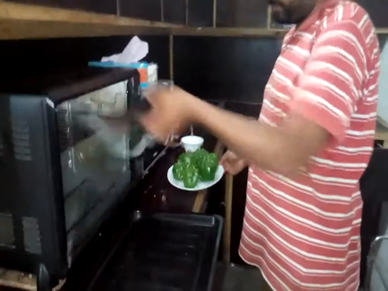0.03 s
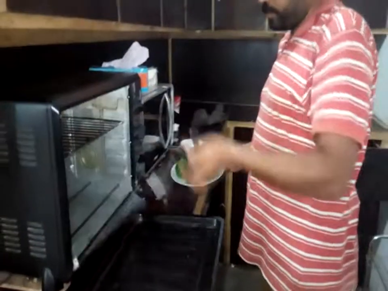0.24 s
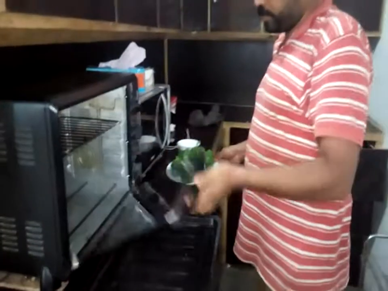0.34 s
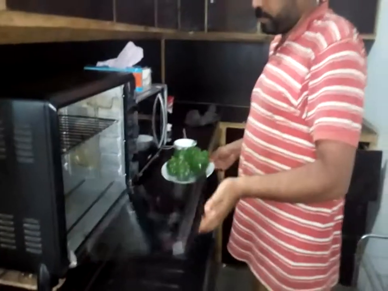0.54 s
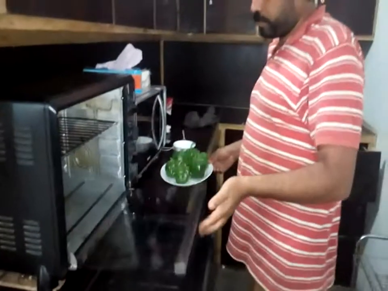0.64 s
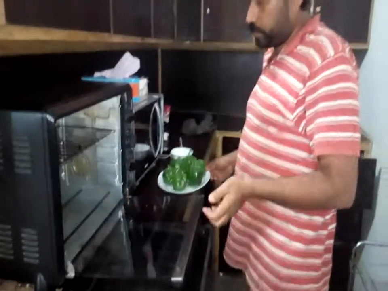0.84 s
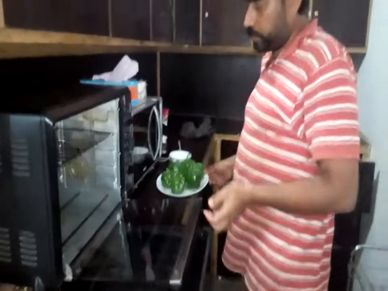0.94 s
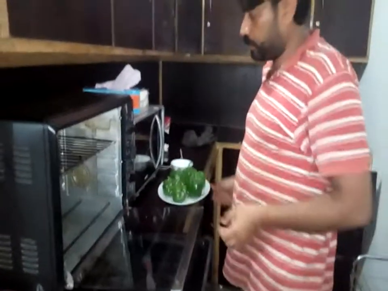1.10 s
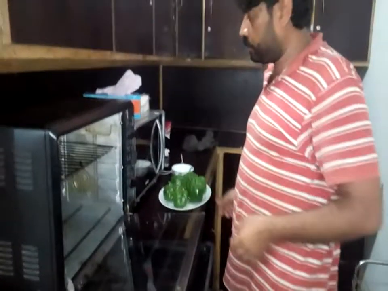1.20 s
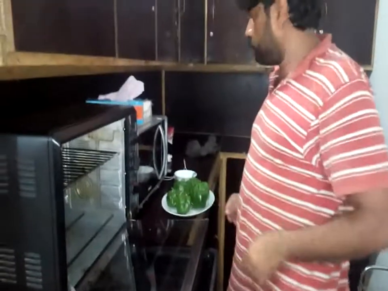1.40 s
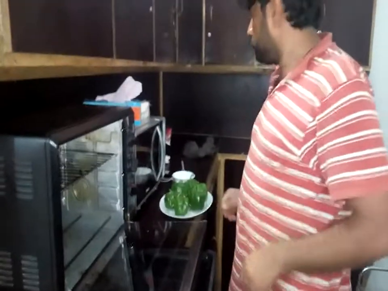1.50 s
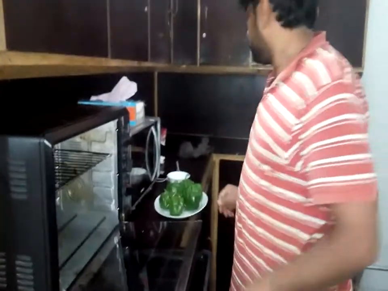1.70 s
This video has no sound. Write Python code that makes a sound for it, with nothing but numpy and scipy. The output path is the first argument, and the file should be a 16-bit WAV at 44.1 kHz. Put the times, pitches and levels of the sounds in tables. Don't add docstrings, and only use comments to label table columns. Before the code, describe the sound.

In a quiet, echoing kitchen, an oven door squeaks upward briefly, rattles and breaks free with a bright crash of sheet metal and rack, low cabinet thump, dwindling clanks, soft hinge rub, then a faint shoe scuff.

```python
import sys
import numpy as np
from scipy import signal
from scipy.fft import rfft, irfft
from scipy.io import wavfile
from scipy.ndimage import uniform_filter1d, minimum_filter1d

SR = 44100
rng = np.random.default_rng(int(sys.argv[2]) if len(sys.argv) > 2 else 0)


def gain_from_db(level_db):
    decades = np.asarray(level_db, float) / 20
    return 10 ** decades


def to_wav(sig):
    pcm = np.clip(np.atleast_2d(sig), -1, 1) * 32767
    pcm = np.round(pcm).astype(np.int16)
    wavfile.write(sys.argv[1], SR, pcm.T)


N = 77175
T = np.arange(N) / SR

# pitch_hz, level_db
HUSH_COLOUR = [(25, -43), (70, -10.5), (190, -4.5), (300, -5), (700, -7), (2700, -5), (5000, -10),
               (9000, -22.5)]
# pitch_hz, level_db
HINGE_AIR = [(350, -24), (700, -18), (1400, 0), (2200, 0.5), (3700, -1.5), (5200, 4.5), (7500, -3),
             (15500, -26)]
# pitch_hz, width_hz, level_db
SHEET_RESONANCES = [(1210, 82, -11), (1687, 150, -7), (2186, 150, -10.5), (2897, 270, 1), (3420, 290, -5.5),
                    (3690, 260, -14), (4530, 340, 0), (4950, 300, -2), (5230, 300, -18), (6200, 440, -2),
                    (6900, 300, -3)]
# pitch_hz, level_db
SETTLING_COLOUR = [(100, -20), (300, -3.5), (1000, 2.5), (2500, -10), (6000, 1), (8000, -7), (15500, -45)]


def evened(x):
    return x / np.sqrt(np.mean(x ** 2) + 1e-20)


def read(points, hz):
    f, value = np.transpose(points)
    return np.interp(np.log(hz + 1), np.log(f + 1), value)


def curve(points, outside=None):
    times, values = np.transpose(points)
    return np.interp(T, times, values, outside, outside)


def fader(points, trim_db=0):
    return gain_from_db(curve(points, outside=-120) + trim_db)


def coloured(x, points):
    return irfft(rfft(x) * gain_from_db(read(points, np.fft.rfftfreq(N, 1 / SR))), N)


def slow(rate_hz):
    size = max(int(SR / rate_hz), 2)
    return evened(uniform_filter1d(uniform_filter1d(rng.standard_normal(N), size), size))


def resonate(x, hz, width):
    r = np.exp(-np.pi * width / SR)
    return signal.lfilter([1 - r, 0, r - 1], [1, -2 * r * np.cos(2 * np.pi * hz / SR), r * r], x)


def decay(s, t60, rise_s):
    age = np.maximum(T - s, 0)
    return np.minimum(age / rise_s, 1) * gain_from_db(-60 * age / t60)


def bursts(rows, colour, modes, ring_db):
    envelope = np.sqrt(sum((gain_from_db(db) * decay(s, t60, .0012)) ** 2 for s, db, t60 in rows))
    noise = rng.standard_normal(N)
    ring = np.zeros(N)
    for hz, width, db in modes:
        width = max(width, 90)
        ring += gain_from_db(db) * resonate(envelope * noise, hz, width) * np.sqrt(2000 / width)
    return envelope * evened(coloured(noise, colour)) + gain_from_db(ring_db) * ring


def friction(points, modes, air, air_db, grain_db):
    noise = rng.standard_normal(N) * gain_from_db(grain_db * slow(250))
    ring = np.zeros(N)
    for hz, width, db in modes:
        narrow = resonate(resonate(noise, hz, 2 * width), hz, width)
        ring += gain_from_db(db) * evened(narrow) * np.sqrt(width)
    return fader(points) * evened(evened(ring) + gain_from_db(air_db) * evened(coloured(noise, air)))


def hush():
    return gain_from_db(-58 + 0.27 * slow(25)) * evened(coloured(rng.standard_normal(N), HUSH_COLOUR))


def kitchen(x):
    # pitch_hz, t60_s
    kitchen_t60 = [(100, 0.98), (300, 0.55), (1000, 0.59), (3000, 0.62), (6000, 0.51), (9000, 0.17),
                   (14000, 0.17)]
    taps = np.zeros(SR)
    at = np.arange(200, SR - 20, 20)
    taps[at + rng.integers(0, 20, len(at))] = rng.choice([-1., 1.], len(at))
    hz, t, z = signal.stft(taps, SR, nperseg=256)
    fall = gain_from_db(-60 * t / read(kitchen_t60, hz)[:, None])
    tail = signal.istft(z * fall, SR, nperseg=256)[1]
    return signal.fftconvolve(x, tail / np.linalg.norm(tail))[:N]


def sole_scuff():
    # start_s, level_db
    scuff_swell = [(1.38, -71), (1.45, -56.5), (1.49, -51.5), (1.55, -54), (1.62, -56), (1.7, -66.5)]
    # pitch_hz, width_hz, level_db
    sole_modes = [(4700, 600, -7), (5420, 350, -2), (6330, 400, -8)]
    # pitch_hz, level_db
    scuff_colour = [(500, -22), (1200, -25), (2500, 0), (4700, 2.5), (6000, 3), (8000, -2.5), (15500, -15)]
    return friction(scuff_swell, sole_modes, scuff_colour, air_db=6, grain_db=1.1)


def hinge_rub():
    # start_s, level_db
    rub_swell = [(.58, -89), (.66, -51), (.72, -47.5), (.77, -48.5), (.79, -44.5), (.84, -48), (.89, -55.5),
                 (.93, -78)]
    # pitch_hz, width_hz, level_db
    rub_resonances = [(2600, 300, -13), (3900, 250, -13), (4950, 150, 0), (5480, 350, -5), (5900, 250, -8),
                      (6600, 400, -9), (8300, 200, -11), (10200, 1200, -24)]
    # start_s, level_db
    sing_swell = [(.6, -70), (.66, -55), (.72, -49), (.77, -47), (.82, -50), (.89, -52), (.93, -62),
                  (.955, -85)]
    # pitch_hz, width_hz, level_db
    sing_resonances = [(1780, 50, -3), (1855, 50, 0), (1940, 70, -6)]
    rub = friction(rub_swell, rub_resonances, HINGE_AIR, air_db=3.5, grain_db=1.3)
    return rub + friction(sing_swell, sing_resonances, HINGE_AIR, air_db=-1.5, grain_db=2.1)


def cabinet_shudder():
    # start_s, level_db
    shudder_swell = [(.25, -49), (.29, -47.5), (.37, -43.5), (.46, -38.5), (.53, -47), (.62, -54.5),
                     (.69, -68), (.72, -97)]
    # pitch_hz, width_hz, level_db
    shudder_modes = [(55, 22, 0), (109.4, 31, 0), (153, 83, -10.5)]
    return friction(shudder_swell, shudder_modes, HUSH_COLOUR, air_db=-49, grain_db=0.87)


def door_hum():
    # start_s, level_db
    pane_swell = [(.225, -82), (.24, -44), (.28, -45), (.33, -56), (.38, -39), (.43, -43), (.56, -47.5),
                  (.67, -55.5), (.74, -84)]
    # start_s, level_db
    frame_swell = [(.265, -80), (.28, -39), (.32, -42), (.35, -36), (.39, -46), (.5, -48), (.6, -57),
                   (.71, -65), (.76, -80)]
    pane_hz = 217 * (1 + 0.006 * slow(5.2))
    frame_hz = 269 * (1 + 0.0067 * slow(5.2))
    pane = fader(pane_swell, 5) * np.sin(2 * np.pi * np.cumsum(pane_hz) / SR)
    frame = fader(frame_swell, 4.5) * np.sin(2 * np.pi * np.cumsum(frame_hz) / SR)
    return pane + frame


def cabinet_thumps():
    # start_s, level_db, tilt_db_per_octave
    blows = [
        (.238, -46.5, 3),
        (.272, -20.5, 0.5),
        (.281, -24, -1.5),
        (.345, -26, -1.5),
        (0.429, -40, 3.5),
        (0.518, -40, -1.5),
    ]
    # pitch_hz, level_db, t60_s
    cabinet_modes = [(111.8, -13, 0.51), (130, 2, 0.18), (194.3, -2.5, 0.29), (326, -22, 0.34),
                     (381.3, -1.5, 0.35), (424.3, -0.5, 0.23), (535.6, -13, 0.22), (610, -13, 0.24),
                     (692, -10, 0.26)]
    out = np.zeros(N)
    for s, db, tilt_db in blows:
        age = np.maximum(T - s, 0)
        ring = np.zeros(N)
        for hz, mode_db, t60 in cabinet_modes:
            gain = gain_from_db(mode_db + tilt_db * np.log2(hz / 100) - 60 * age / t60)
            ring += gain * np.sin(2 * np.pi * (hz * age + rng.random()))
        push = np.sin(2 * np.pi * 240 * age) * gain_from_db(2.05 * tilt_db - 60 * age / 0.024)
        out += gain_from_db(db) * (0.36 * ring * np.minimum(age / 0.0029, 1) + gain_from_db(4) * push)
    damped_s, damped_t60 = 0.75, 0.24
    return out * gain_from_db(-60 * np.maximum(T - damped_s, 0) / damped_t60)


def rack_wires():
    # pitch_hz, level_db, t60_s
    wires = [(7650, -43, .8), (8350, -44, .9), (9000, -46, .8), (9950, -40, .75), (11400, -38, .45)]
    noise, crash_s = rng.standard_normal(N), .2855
    return sum(gain_from_db(db) * decay(crash_s, t60, .002) * evened(resonate(noise, hz, 220)) for hz, db, t60 in wires)


def wire_tick():
    tick_hz = [5600, 6150]
    tones = np.sin(2 * np.pi * tick_hz[0] * T) + 0.74 * np.sin(2 * np.pi * tick_hz[1] * T)
    contact = 0.26 * evened(coloured(rng.standard_normal(N), SETTLING_COLOUR))
    return gain_from_db(-14) * decay(.4966, .011, .0012) * (tones + contact)


def settling():
    # start_s, level_db, t60_s
    late_rebounds = [
        (.385, -23, 0.094),
        (.42, -26, 0.074),
        (.455, -31.5, 0.086),
        (.515, -36.5, 0.13),
        (.54, -40, 0.093),
    ]
    return bursts(late_rebounds, SETTLING_COLOUR, SHEET_RESONANCES, ring_db=-8.5)


def hinge_squeak():
    # start_s, pitch_hz
    squeak_glide = [(0, 1990), (.022, 2025), (.04, 2085), (.065, 2140), (.088, 2155), (.105, 2185),
                    (.117, 2225), (.15, 2232), (.2, 2235)]
    # start_s, level_db
    squeak_swell = [(0, -49), (.03, -42), (.065, -45.5), (.095, -40.5), (.112, -53), (.13, -40),
                    (.15, -48.5), (.165, -69), (.21, -46)]
    # multiple, level_db
    squeak_partials = [(1, -2), (2, -1), (3, -8), (4, -15), (5, -28.5)]
    # pitch_hz, width_hz, level_db
    squeak_modes = [(3300, 880, 5), (5160, 290, -13), (4140, 92, -1)]
    flutter_db, strand_ratio, strand_db = 5.0, .968, -7
    turns = np.cumsum(curve(squeak_glide) * (1 + .005 * slow(190))) / SR
    tone = np.zeros(N)
    for k, db in squeak_partials:
        main_gain = gain_from_db(db + flutter_db * np.tanh(slow(190)))
        strand_gain = gain_from_db(db + strand_db + flutter_db * np.tanh(slow(55)))
        tone += main_gain * np.sin(2 * np.pi * k * turns)
        tone += strand_gain * np.sin(2 * np.pi * k * strand_ratio * turns)
    noise = rng.standard_normal(N)
    body = sum(gain_from_db(db) * resonate(noise, hz, width) for hz, width, db in squeak_modes)
    hiss = evened(evened(coloured(noise, HINGE_AIR)) + 1.3 * evened(body))
    return fader(squeak_swell) * (tone + gain_from_db(-14) * hiss)


def catch_rattle():
    # start_s, level_db, t60_s
    lift_contacts = [
        (.2182, -26, .06),
        (.2215, -25, .05),
        (.227, -28, .05),
        (.232, -28, .05),
    ]
    # pitch_hz, width_hz, level_db
    lift_resonances = [(987, 110, -8), (1690, 67, -7), (2520, 83, -9.5), (5840, 200, -8), (5820, 170, 2.5),
                       (7150, 1200, 8)]
    # start_s, level_db, t60_s
    rattle_contacts = [
        (.2365, -24, 0.082),
        (.2405, -24, 0.067),
        (.247, -23, 0.071),
        (.2535, -26.5, 0.076),
        (.260, -29.5, 0.064),
        (.266, -25.5, 0.041),
    ]
    # pitch_hz, width_hz, level_db
    catch_resonances = [(950, 250, -10), (1744, 110, -5.5), (2700, 540, 0), (4287, 77, 2.5),
                        (5100, 27, 0.5), (5100, 140, -10), (6000, 150, 1.5), (7650, 58, -10)]
    # pitch_hz, level_db
    catch_colour = [(100, -27), (250, -35), (600, -6), (1000, -4.5), (2700, -2.5), (5200, 7), (7000, 4.5),
                    (15500, 4.5)]
    lift = bursts(lift_contacts, catch_colour, lift_resonances, ring_db=-0.5)
    rattle = bursts(rattle_contacts, catch_colour, catch_resonances, ring_db=-0.5)
    knock = gain_from_db(-39) * decay(.2155, 0.054, 0.0028) * np.sin(2 * np.pi * 900 * T)
    return lift + rattle + knock


def clanks():
    # start_s, level_db, pitch_hz, t60_s
    struck_parts = [(.2195, -28.5, 5760, 0.046), (0.2377, -21.5, 4967, 0.052), (.251, -19.5, 5270, 0.06),
                    (.2545, -23.5, 4996, 0.13), (0.262, -25, 4910, 0.079), (.2415, -32, 1045, 0.063),
                    (0.2377, -29.5, 2750, .06), (0.2854, -13.5, 3300, 0.06), (0.286, -15, 5550, 0.022),
                    (.2872, -8, 6870, 0.018), (0.293, -12.5, 4623, 0.047), (0.2917, -20, 2330, .04),
                    (0.2991, -14.5, 4526, 0.062), (0.301, -12, 3639, 0.061), (0.304, -23, 3400, 0.044),
                    (0.308, -22, 2358, 0.067), (0.311, -27, 1210, 0.09), (0.313, -12.5, 6200, 0.027),
                    (.327, -16.5, 2290, 0.053), (.331, -16, 3770, 0.057), (.346, -18, 2420, 0.033),
                    (0.36, -35, 3550, 0.046), (0.366, -19.5, 1150, 0.031), (0.387, -22, 3530, 0.045),
                    (.772, -45.5, 4950, 0.23), (0.45, -29.5, 2600, 0.11), (.507, -33.5, 3614, 0.05)]
    out = np.zeros(N)
    for s, db, hz, t60 in struck_parts:
        p, q = rng.random(2)
        second_hz = hz * (1 + .035 * (2 * q - 1))
        pair = np.sin(2 * np.pi * (hz * T + p)) + 0.65 * np.sin(2 * np.pi * (second_hz * T + q))
        out += gain_from_db(db) * decay(s, t60, t60 / 30) * pair
    return out


def sheet_crash():
    # start_s, level_db, t60_s
    crash_hits = [
        (.2855, -11.5, 0.05),
        (.293, -9.5, 0.016),
        (.2995, -15, 0.04),
        (.305, -14, 0.019),
        (.311, -20.5, 0.16),
        (.3175, -23.5, 0.042),
        (.327, -21, 0.1),
        (.337, -22.5, 0.039),
        (.347, -24.5, 0.06),
        (.363, -22, 0.099),
    ]
    # pitch_hz, level_db
    sheet_colour = [(100, -10), (270, -3.5), (900, -4.5), (1500, -6), (2300, 0.5), (4500, -4.5),
                    (7500, -2.5), (15500, -7.5)]
    return bursts(crash_hits, sheet_colour, SHEET_RESONANCES, ring_db=-4)


def scene():
    rubs = sole_scuff() + hinge_rub()
    low = cabinet_shudder() + door_hum() + cabinet_thumps()
    tick, whine, catch = wire_tick(), hinge_squeak(), catch_rattle()
    struck, crash = clanks(), sheet_crash()
    send = gain_from_db(-2) * (crash + 0.68 * tick) + gain_from_db(-9) * struck
    send += gain_from_db(-4.5) * catch + gain_from_db(-5.5) * whine + gain_from_db(-13) * rubs
    metal = catch + settling() + crash + struck + rack_wires() + tick
    return (metal + whine + rubs + low + kitchen(send) + hush())[None]


def low_pass(x):
    return signal.sosfilt(signal.butter(12, 15700, fs=SR, output="sos"), x)


def record(dry):
    # pitch_hz, level_db
    mic_response = [(20, -7), (38, -18), (60, -0.5), (5600, -0.5), (6800, -9), (8000, -16.5),
                    (11000, -15.5), (15500, -32.5)]
    limit = .46
    edge = np.minimum(np.minimum(np.arange(N), np.arange(N)[::-1]) / 40, 1)
    heard = coloured(dry[0] * edge, mic_response) + gain_from_db(-80.5) * rng.standard_normal(N)
    gain = minimum_filter1d(limit / np.maximum(abs(heard), limit), size=121)
    limited = heard * uniform_filter1d(gain, size=121)
    return low_pass(limited[None])


dry = scene()
out = record(dry)
to_wav(out)
```